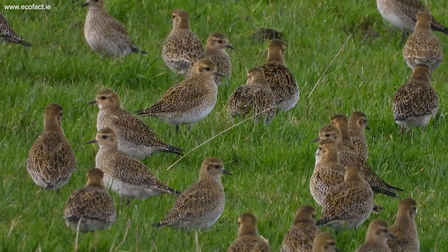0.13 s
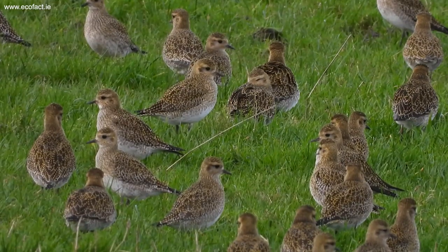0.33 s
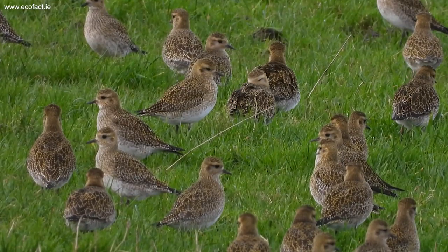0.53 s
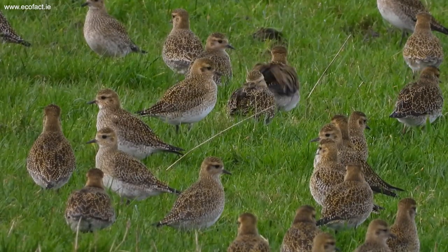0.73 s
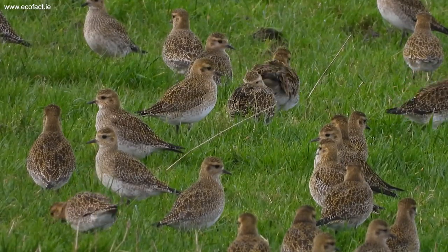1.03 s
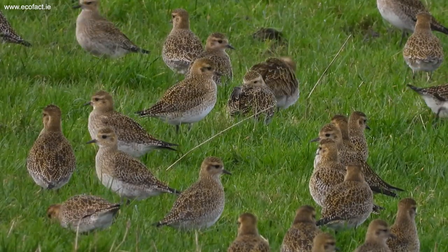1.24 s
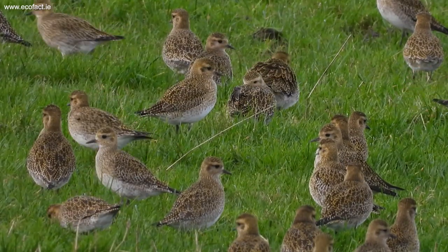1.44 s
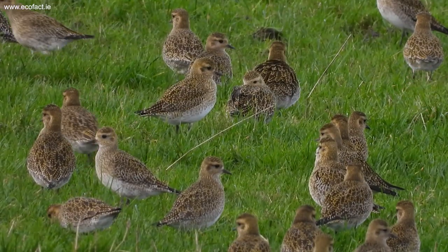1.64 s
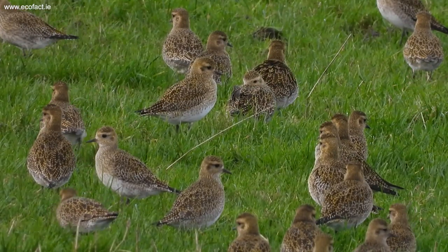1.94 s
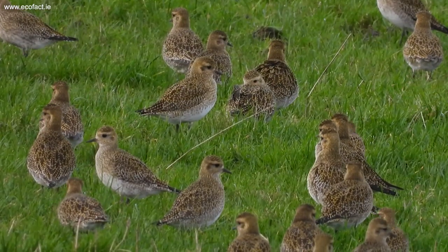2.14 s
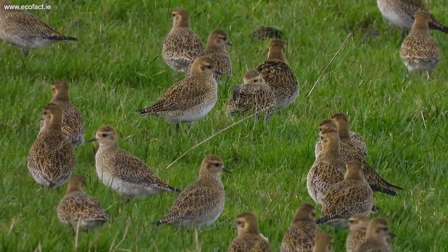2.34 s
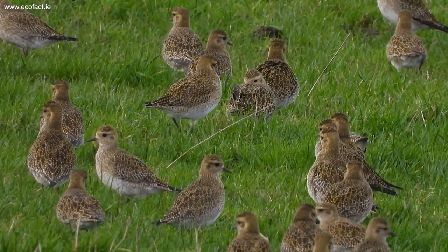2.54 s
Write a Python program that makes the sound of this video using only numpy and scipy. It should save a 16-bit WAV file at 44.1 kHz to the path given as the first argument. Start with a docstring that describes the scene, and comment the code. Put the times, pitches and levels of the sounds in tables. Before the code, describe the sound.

Thin, clear bird whistles overlap constantly from a plover flock, with tiny chirps and soft wind hiss.

```python
"""Open grassland, with a flock of plovers some way off from a two-port camera microphone.
A light wind, banded noise, hisses in the grass and now and then buffets the ports in low thumps.
Far plovers and small chirping birds, bent sine notes, make a chorus with a scattered echo.
Feathers rustle in grainy noise and one call buzzes in rapid upward sweeps.
Nearer birds whistle thin bent sines over it all, with a few faint low calls."""
import sys
import numpy as np
from scipy import signal
from scipy.fft import rfft, irfft
from scipy.io import wavfile
from scipy.ndimage import uniform_filter1d

SR = 44100
rng = np.random.default_rng(int(sys.argv[2]) if len(sys.argv) > 2 else 0)


def inscribe(sig):
    """Save sig as 16-bit PCM at rate SR to the path in sys.argv[1].

    A 1-D sig is mono; a 2-D sig holds one channel per row.
    Samples are clipped to [-1, 1] before scaling.
    """
    pcm = np.round(np.clip(np.atleast_2d(sig).T, -1, 1) * 32767)
    wavfile.write(sys.argv[1], SR, pcm.astype(np.int16))


N = 118188
t = np.arange(N) / SR

# wind in the grass, before swell, gust and flicker:
# centre_hz, density_db (dB per Hz), port_likeness (0-1)
WIND_SPECTRUM = [(39.7, -122, 0.5), (108, -106, 0), (177, -88.5, 0.6), (264, -94, 0.7), (377, -86.5, 0.94),
                 (596, -89, 0.77), (890, -88.5, 0.79), (1290, -94, 0.69), (1600, -92, 0.72),
                 (3070, -99, 0.8), (3910, -100, 0), (4280, -95.5, 0.4), (5190, -99, 0.1), (6160, -103, 0),
                 (7810, -113, 0.02), (8870, -119, 0.1), (12420, -124, 0.4)]
# gusts of the low wind, full below 800 Hz and gone above 1600 Hz: time_s, gain_db
LOW_GUSTS = [(0, -5), (.2, 0.5), (.45, -2), (.6, -1.5), (.9, -2.5), (1.3, -2.5), (1.7, -4), (2.05, -0.5),
             (2.3, -4), (2.55, 1.5), (2.68, -7.5)]
SWELL_DB, FLICKER_DB, LOW_FLICKER_DB = .7, 1.7, 2.8

# wind buffets on the ports: start_s, peak_db, left_minus_right_db
WIND_BUFFETS = [(0.849, -67, 16), (0.898, -62.5, 10), (1.058, -67, 21), (1.188, -71, 2),
                (1.483, -54.5, -11.5), (1.56, -63, 2), (1.629, -63.5, -4), (1.953, -72, -7),
                (2.053, -68.5, -13), (2.159, -62.5, 6.0), (2.219, -65, -3), (2.263, -65.5, 14),
                (2.619, -71.5, -24.5)]
BUFFET_HZ, BUFFET_WIDTH_HZ = 172.7, 110
BUFFET_S = .014  # from start to peak, and the spread of the swell

# scratchy rustles of feathers, level before the ports' noises are mixed:
# start_s, length_s, centre_hz, width_hz, level_db
FEATHER_RUSTLES = [(0.306, 0.13, 6600, 1220, -75), (0.544, .16, 4230, 2050, -64),
                   (1.156, 0.046, 5230, 2760, -61), (1.82, 0.12, 5050, 2410, -67.5),
                   (2.284, 0.16, 4650, 1980, -66)]
RUSTLE_GRAIN_DB = 2.5

# far plover chorus, level of its whistles before scatter: time_s, level_db
CHORUS_LEVEL = [(0, -53), (.15, -60), (.3, -58.5), (.45, -62), (.54, -64.5), (.65, -52.5), (.8, -62.5),
                (.95, -59.5), (1.1, -59.5), (1.25, -60.5), (1.4, -61), (1.6, -56), (1.7, -67), (1.85, -61),
                (2.0, -61), (2.16, -59), (2.3, -55.5), (2.5, -58), (2.68, -52.5)]
CHORUS_HZ, CHORUS_SPREAD_HZ, CHORUS_BEND_HZ, CHORUS_LENGTH_S = 2273, 335, 76.5, .06
CROWD_SCATTER_DB, CROWD_PAN_DB = 2, 2
FAR_WAVER_HZ = 14.3

# clearest chirps of small birds:
# start_s, length_s, start_hz, middle_hz, end_hz, level_db, left_minus_right_db
CLEAR_CHIRPS = [(0.012, 0.055, 3700, 3730, 3500, -60, 10), (0.081, 0.038, 4210, 4250, 4380, -62, 0.8),
                (0.099, 0.077, 6750, 6580, 6730, -76, 0.1), (0.112, 0.062, 4472, 4380, 4256, -60, 4),
                (0.174, 0.015, 4540, 4580, 4870, -57.5, 6), (0.298, 0.056, 5101, 5340, 5440, -72, -4),
                (0.468, 0.026, 3216, 3350, 3520, -61, 5), (0.571, 0.029, 4590, 4320, 4190, -61.5, -1),
                (0.578, 0.017, 3590, 3514, 3350, -59, 3), (0.591, 0.047, 6410, 6400, 6450, -69.5, 0),
                (0.603, 0.018, 3430, 3481, 3350, -67.5, -4), (0.631, 0.046, 3951, 4000, 3921, -67, 1),
                (0.948, 0.044, 3930, 4010, 4100, -68.5, 4), (0.977, 0.036, 4750, 4780, 4900, -65, -8),
                (1.003, 0.03, 4240, 4380, 4470, -58.5, 2), (1.259, 0.03, 4125.0, 4140, 4140, -62, 0),
                (1.351, 0.054, 4067.0, 4160, 4490, -59, 4.5), (1.502, 0.029, 4110, 4360, 4480, -59, 4),
                (1.79, 0.035, 4410, 4400, 4570, -63.5, 7), (1.825, 0.018, 3901, 3920, 4170, -62.5, 2),
                (1.837, 0.015, 6197.0, 6240, 6000, -65.5, -5), (1.176, 0.015, 4180, 4380, 4570, -65, 2),
                (1.855, 0.027, 6170, 6400, 6460, -67, 2), (1.861, 0.039, 4120, 4310, 4120, -65, 2),
                (2.048, 0.055, 4030, 4250, 4340, -67, 4), (2.186, 0.04, 4385.0, 4309.0, 4150, -60, 1),
                (2.231, 0.033, 4660, 4700, 4660, -66, -1), (2.329, 0.083, 4540.0, 4610.0, 4600, -62, 6),
                (2.389, 0.032, 4500, 4360, 4080, -57, 6.5), (2.42, 0.057, 3430, 3600, 3850, -61.5, 2),
                (2.466, 0.024, 3880, 3930, 3970, -61.5, 3), (2.562, 0.045, 3980, 4090, 4350, -62, 1),
                (2.661, 0.022, 4250, 4200, 4080, -68, -2), (2.649, 0.015, 4348.0, 4390, 4250, -57.5, 8)]
CHIRP_FADE_S, CHIRP_WAVER_HZ, CHIRP_FLUTTER_DB = .011, 28, 2.4
FAR_CHIRP_HZ, FAR_CHIRP_SPREAD_HZ, FAR_CHIRP_BEND_HZ = 4302, 450, 141
FAR_CHIRP_S, FAR_CHIRP_DB = .024, -72
CHATTER_HZ, CHATTER_S, CHATTER_DB = 3413, .035, -71

# buzzy call, level before the shape of each sweep: time_s, level_db
BUZZ_LEVEL = [(1.63, -73), (1.652, -59.5), (1.67, -58.5), (1.69, -49.5), (1.712, -56), (1.723, -64),
              (1.75, -65)]
BUZZ_ALIGN_S, BUZZ_PER_S = 1.6865, 101  # a sweep begins near the first, so many follow in a second
BUZZ_LOW_HZ, BUZZ_SWEEP_HZ = 5490, 1053
BUZZ_TOP_DB, BUZZ_FILL, BUZZ_PAN_DB = -4.5, .3, 6.5

# faint low calls, perhaps of far geese: start_s, length_s, pitch_hz, level_db
FAINT_LOW_CALLS = [(.115, 0.03, 529, -57.5), (0.155, 0.033, 871, -59.5), (.19, 0.039, 486, -58),
                   (.365, 0.065, 506.4, -61), (.79, 0.044, 517, -62), (1.205, 0.028, 385, -61),
                   (1.23, 0.033, 765, -62.5), (1.948, 0.028, 418, -63), (1.999, 0.035, 455, -61),
                   (2.234, 0.0484, 362.3, -66), (2.236, 0.063, 633, -60.5), (2.438, 0.045, 470, -61.5),
                   (2.54, 0.023, 503, -57), (2.63, 0.03, 900, -61)]
LOW_CALL_WAVER_HZ = 25

# near whistles:
# start_s, length_s, start_hz, middle_hz, end_hz, early_db, late_db, left_minus_right_db
WHISTLES = [(0.028, 0.11, 2420, 2460, 2424, -50, -48.5, 0),
            (0.046, 0.073, 2270.0, 2237, 2165, -41.5, -50, 0.5),
            (0.124, 0.053, 2218.0, 2185, 2250, -49.5, -54, 6),
            (0.176, 0.047, 2950, 2960, 2910, -49, -55.5, 11.5),
            (0.177, 0.029, 2306.0, 2345, 2495, -49.5, -41.5, 1),
            (0.192, 0.021, 2451, 2544, 2630, -46, -57, -5),
            (0.22, 0.064, 2265.0, 2236, 2347, -48.5, -52.5, 0.3),
            (0.228, 0.084, 2880, 2854, 3010, -55, -61, 4), (0.288, 0.055, 2381, 2515, 2600, -59, -60, 6),
            (0.311, 0.054, 2376, 2396, 2400, -64.5, -48.5, -5.5),
            (0.368, 0.12, 2491, 2468, 2447, -50, -50, -4), (0.58, 0.02, 2240, 2214, 2180, -51, -38, 3.5),
            (0.606, 0.18, 2190, 2212, 2230, -38.5, -38.5, 0.9),
            (0.795, 0.016, 2195, 2164, 2220, -34, -41, 3), (0.564, 0.026, 2351, 2384, 2700, -47, -55, -3),
            (0.595, 0.1, 2343.0, 2380, 2320, -59, -56, -10),
            (0.605, 0.037, 2710.0, 2720, 2620, -49.5, -45, -3),
            (0.695, 0.033, 2398.0, 2447, 2365, -47, -53, -4),
            (0.803, 0.064, 2320.0, 2215, 2238, -45.5, -46.5, -2),
            (0.827, 0.11, 2288.0, 2318, 2233, -56.5, -50, 4),
            (0.937, 0.035, 2276.0, 2285, 2400, -65, -64, 8),
            (0.989, 0.036, 2581.0, 2583, 2350, -51.5, -49.5, 5),
            (1.03, 0.025, 2445.0, 2365, 2330, -51, -59, 5), (1.059, 0.091, 2391, 2413, 2470, -55, -62, 5),
            (1.152, 0.12, 2466, 2457, 2420, -48, -47, 2), (1.161, 0.077, 2228.0, 2210, 2136, -52, -49, -2),
            (1.241, 0.073, 2232.0, 2275, 2307, -57.5, -49.5, 2),
            (1.265, 0.03, 2360.0, 2360, 2320, -51, -59.5, -7),
            (1.301, 0.044, 1974.0, 1953, 1979.0, -58, -58, -1),
            (1.322, 0.13, 2334.0, 2366, 2433, -57.5, -53.5, -3),
            (1.372, 0.027, 2260, 2200, 2110, -54, -54, 1.5),
            (1.428, 0.15, 2158, 2167, 2230, -48.5, -43, 1.5),
            (1.569, 0.043, 2478.0, 2346, 2230, -54.5, -56, -1),
            (1.625, 0.065, 2170, 2212, 2240, -51.5, -50.5, -1),
            (1.645, 0.032, 2400, 2357, 2200, -56, -48, 3), (1.707, 0.12, 2205.0, 2157, 2086, -53, -49.5, 1),
            (1.739, 0.036, 2388.0, 2350, 2280, -53, -58, -1),
            (1.778, 0.15, 1625, 1624, 1683, -62, -59, -0.5),
            (1.838, 0.062, 2243.0, 2178, 2307, -57, -49.5, -0.5),
            (1.877, 0.13, 2354, 2370, 2333, -53, -50, -4),
            (1.901, 0.058, 2202.0, 2201, 2283, -47.5, -57, -1.5),
            (1.927, 0.073, 2446.0, 2515, 2610, -53.5, -57.5, 3),
            (1.958, 0.12, 2162.0, 2144, 2240, -50, -49.5, -1),
            (1.965, 0.077, 2384.0, 2467, 2505, -54, -45.5, 1.5),
            (1.998, 0.14, 2335, 2375, 2322, -46, -55, -1.5),
            (2.019, 0.037, 1969.0, 1957, 1970, -64, -52, 1),
            (2.059, 0.073, 2164.0, 2186, 2260, -50, -45, 1), (2.19, 0.042, 2230, 2277, 2196, -47, -49, -2),
            (2.228, 0.036, 2280, 2305, 2350, -39.5, -58, 3),
            (2.244, 0.055, 2201.0, 2170, 2200, -46.5, -51, -1),
            (2.285, 0.064, 2330.0, 2320, 2266, -46.5, -56, -2.5),
            (2.328, 0.061, 2136.0, 2207, 2100, -63, -51.5, 1),
            (2.351, 0.027, 2134.0, 2132, 2100, -54, -52, 2),
            (2.375, 0.036, 2359.0, 2376, 2390, -50, -47, 1),
            (2.383, 0.102, 2471.0, 2480, 2400, -54, -55, 6),
            (2.417, 0.049, 2240.0, 2284, 2270, -54, -46.5, -2),
            (2.43, 0.04, 2620, 2583, 2600, -51, -57, -0.1),
            (2.52, 0.054, 2240, 2208, 2200, -44.5, -51.5, -2),
            (2.625, 0.036, 2190, 2257, 2296, -39.5, -54, 3),
            (2.599, 0.032, 2083.0, 2073, 2110, -58, -52, 0.0),
            (2.58, 0.034, 2350, 2307, 2260, -47, -57.5, 2),
            (2.61, 0.048, 2576, 2630, 2680, -54.5, -57, -0.2)]
FADE_S, WAVER_HZ, FLUTTER_DB = .013, 5.5, 1.4
FADE_SHARE = .16  # of the note's length, added to its fades
OCTAVE_DB, HIGH_OCTAVE_DB = -34, -15  # octave against the fundamental

ECHO_T60_S, ECHO_DB, FAR_ECHO_DB = .28, -15, -4.5
LOW_CUT_HZ, TOP_HZ = 60, 12000


def undb(db):
    """Gain of a level in dB."""
    return 10 ** (np.asarray(db) / 20)


def curve(rows):
    """A (time_s, value) table joined by straight lines."""
    return np.interp(t, *np.array(rows).T)


def walk(rate, size=N):
    """Random levels held 1 / rate s and smoothed by two moving averages; spread near 1."""
    hold = int(SR / rate)
    steps = np.repeat(rng.standard_normal(size // hold + 1), hold)
    smooth = uniform_filter1d(uniform_filter1d(steps, hold), hold)
    return 1.4 * smooth[:size]


def pan(x, pan_db):
    """Mono to left and right, pan_db apart in level."""
    return x * undb(np.array([[pan_db], [-pan_db]]) / 2)


def wind():
    """Wind hiss: noise in third-octave steps that swells together, flickers by band and gusts when low."""
    centre_hz, density_db, port_likeness = np.array(WIND_SPECTRUM).T
    log_f = np.log(np.maximum(np.fft.rfftfreq(N, 1 / SR), 1))
    like = np.clip(np.interp(log_f, np.log(centre_hz), port_likeness), 0, 1)
    colour = undb(np.interp(log_f, np.log(centre_hz), density_db))
    # sum and difference noises set how alike the two ports are
    mid, side = rfft(rng.standard_normal((2, N))) * np.sqrt([1 + like, 1 - like]) * colour
    ports = np.array([mid + side, mid - side]) * np.sqrt(SR / 4)
    step = np.log(2) / 3
    swell_db, gust_db = SWELL_DB * walk(3.89), curve(LOW_GUSTS)
    out = 0
    for centre in np.arange(np.log(30), np.log(14000), step):
        share = np.cos(np.pi / 2 * np.clip((log_f - centre) / step, -1, 1)) ** 2
        depth_db = np.interp(centre, np.log([250, 2500]), [LOW_FLICKER_DB, FLICKER_DB])
        lowness = np.clip(np.log(1600) - centre, 0, .7) / .7
        level_db = swell_db + lowness * gust_db + depth_db * walk(16)
        out = out + irfft(ports * share, N) * undb(level_db)
    return out


def buffets():
    """Short low thumps of wind: bell-shaped swells of band noise, unrelated at the two ports."""
    env = 0
    for start, peak_db, pan_db in WIND_BUFFETS:
        bell = np.exp(-(t - start - BUFFET_S) ** 2 / BUFFET_S ** 2)
        env = env + pan(undb(peak_db) * bell, pan_db)
    edges = [BUFFET_HZ - BUFFET_WIDTH_HZ / 2, BUFFET_HZ + BUFFET_WIDTH_HZ / 2]
    band = signal.butter(2, edges, "band", fs=SR, output="sos")
    air = signal.sosfilt(band, rng.standard_normal((2, N)))
    return env * air / air.std()


def rustles():
    """Feather rustles: grainy bursts of treble noise, partly unrelated at the two ports."""
    out = 0
    for start, length, hz, width_hz, level_db in FEATHER_RUSTLES:
        band = signal.butter(4, [hz - width_hz / 2, hz + width_hz / 2], "band", fs=SR, output="sos")
        air = signal.sosfilt(band, rng.standard_normal((3, N)))
        arch = np.sin(np.pi * np.clip((t - start) / length, 0, 1))
        env = arch * undb(level_db + RUSTLE_GRAIN_DB * walk(250))
        shared, own = air[0], air[1:]
        out = out + env * (shared + 1.27 * own) / air.std()
    return out


def add_note(out, row, fade_s, waver_hz, flutter_db, octave_db):
    """One whistled note: a near sine bent through three pitches, wavering a little, with an octave."""
    start, length, start_hz, middle_hz, end_hz, early_db, late_db, pan_db = row
    fade_s = fade_s + FADE_SHARE * length
    i, n = int((start - fade_s / 2) * SR), int((length + fade_s) * SR)
    u = np.linspace(-1, 1, n)  # place in the note
    waver = walk(60.1, size=SR // 3)[:n]
    flutter = walk(74.6, size=SR // 3)[:n]
    slope, bow = (end_hz - start_hz) / 2, (start_hz + end_hz) / 2 - middle_hz
    pitch_hz = middle_hz + slope * u + bow * u ** 2 + waver_hz * waver
    phase = 2 * np.pi * (np.cumsum(pitch_hz) / SR + rng.random())
    to_end_s = (1 - abs(u)) * n / 2 / SR
    edge = np.sin(np.pi / 2 * np.clip(to_end_s / fade_s, 0, 1)) ** 2
    level_db = np.interp(u, [-.5, .5], [early_db, late_db]) + flutter_db * flutter
    tone = np.sin(phase) + undb(octave_db) * np.sin(2 * phase)
    note = pan(np.sqrt(2) * edge * undb(level_db) * tone, pan_db)
    a, b = np.clip([i, i + n], 0, N)
    out[:, a:b] += note[:, a - i:][:, :b - a]


def crowd(count, hz, spread_hz, bend_hz, length_s, fade_s, waver_hz):
    """Notes in jittered succession, within spread_hz of a common pitch and weaker away from it."""
    out = np.zeros((2, N))
    z, r = rng.standard_normal((count, 4)), rng.random((count, 4))
    for k in range(count):
        off = r[k, 2] - r[k, 3]
        middle_hz = hz + spread_hz * off
        level_db = CROWD_SCATTER_DB * z[k, 2] - 6 * abs(off)
        start = (k + 5 * r[k, 0] - 9) / (count - 9) * N / SR
        row = (start, length_s * (.5 + r[k, 1]),
               middle_hz + bend_hz * z[k, 0], middle_hz, middle_hz + bend_hz * z[k, 1],
               level_db, level_db, CROWD_PAN_DB * z[k, 3])
        add_note(out, row, fade_s, waver_hz, FLUTTER_DB, OCTAVE_DB)
    return out


def far_birds():
    """Far plovers and chirps: crowds of short bent sines, with the clearest chirps placed singly."""
    chatter = crowd(count=110, hz=CHATTER_HZ, spread_hz=FAR_CHIRP_SPREAD_HZ,
                    bend_hz=FAR_CHIRP_BEND_HZ, length_s=CHATTER_S,
                    fade_s=CHIRP_FADE_S, waver_hz=CHIRP_WAVER_HZ)
    plovers = crowd(count=380, hz=CHORUS_HZ, spread_hz=CHORUS_SPREAD_HZ,
                    bend_hz=CHORUS_BEND_HZ, length_s=CHORUS_LENGTH_S,
                    fade_s=FADE_S, waver_hz=FAR_WAVER_HZ)
    chirps = crowd(count=200, hz=FAR_CHIRP_HZ, spread_hz=FAR_CHIRP_SPREAD_HZ,
                   bend_hz=FAR_CHIRP_BEND_HZ, length_s=FAR_CHIRP_S,
                   fade_s=CHIRP_FADE_S, waver_hz=CHIRP_WAVER_HZ)
    out = plovers * undb(curve(CHORUS_LEVEL)) + chirps * undb(FAR_CHIRP_DB) + chatter * undb(CHATTER_DB)
    for *note, level_db, pan_db in CLEAR_CHIRPS:
        row = (*note, level_db, level_db, pan_db)
        add_note(out, row, CHIRP_FADE_S, CHIRP_WAVER_HZ, CHIRP_FLUTTER_DB, -60)
    return out


def buzz():
    """Buzzy call: upward sweeps about a hundred a second, each strong low and weaker at its top."""
    u = ((t - BUZZ_ALIGN_S) * BUZZ_PER_S + .14 * walk(70)) % 1  # place in the sweep
    pitch_hz = BUZZ_LOW_HZ + BUZZ_SWEEP_HZ * u + 110 * walk(330)
    tone = np.sin(2 * np.pi * np.cumsum(pitch_hz) / SR)
    pulses = BUZZ_FILL + np.sin(2 * np.pi * u) ** 2  # two per sweep
    shape = pulses * undb(BUZZ_TOP_DB * (u > .5) + 4.2 * walk(400))
    on = (t > BUZZ_LEVEL[0][0]) & (t < BUZZ_LEVEL[-1][0])
    return pan(2 * on * undb(curve(BUZZ_LEVEL)) * shape * tone, BUZZ_PAN_DB)


def near_birds():
    """Near whistles and low calls as bent sines; the highest whistles have a stronger octave."""
    out = np.zeros((2, N))
    for start, length, pitch_hz, level_db in FAINT_LOW_CALLS:
        row = (start, length, pitch_hz, pitch_hz, pitch_hz, level_db, level_db, 0)
        add_note(out, row, FADE_S, LOW_CALL_WAVER_HZ, CHIRP_FLUTTER_DB, -12)
    for row in WHISTLES:
        middle_hz = row[3]
        octave_db = HIGH_OCTAVE_DB if middle_hz > 2770 else OCTAVE_DB
        add_note(out, row, FADE_S, WAVER_HZ, FLUTTER_DB, octave_db)
    return out


def echo(x, db):
    """Short scattered echo off the field: decaying noise, partly shared by the ports, added to the sound."""
    tail = t[:SR // 3]
    decay = undb(-60 * tail / ECHO_T60_S) * (tail > .005)
    noise = rng.standard_normal((3, len(tail))) * decay
    room = noise[0] + .61 * noise[1:]
    room = room * undb(db) / np.sqrt((room ** 2).sum(axis=1, keepdims=True))
    return x + signal.fftconvolve(x.mean(axis=0)[None], room, axes=1)[:, :N]


def scene():
    """Wind on the grass and ports, then far and near birds, the far ones with more echo."""
    far = echo(far_birds(), FAR_ECHO_DB)
    near = echo(rustles() + buzz() + near_birds(), ECHO_DB)
    return wind() + buffets() + far + near


def record(dry):
    """The camera rolls off the bass and cuts the top."""
    thin = signal.sosfilt(signal.butter(2, LOW_CUT_HZ, "high", fs=SR, output="sos"), dry)
    return signal.sosfilt(signal.ellip(8, .2, 70, TOP_HZ, fs=SR, output="sos"), thin)


dry = scene()
out = record(dry)
inscribe(out)
```